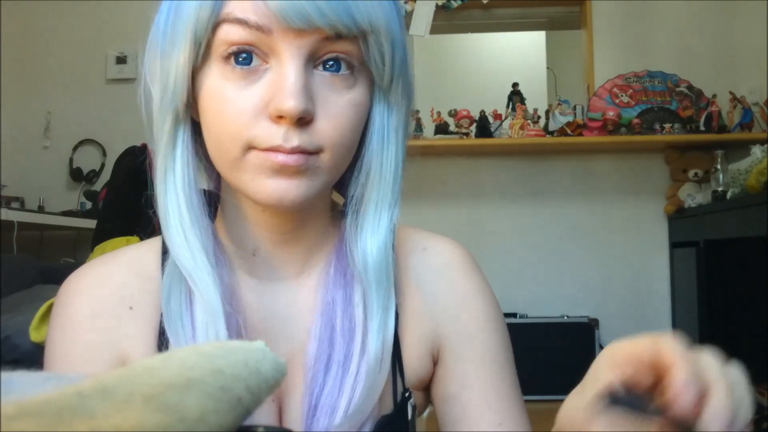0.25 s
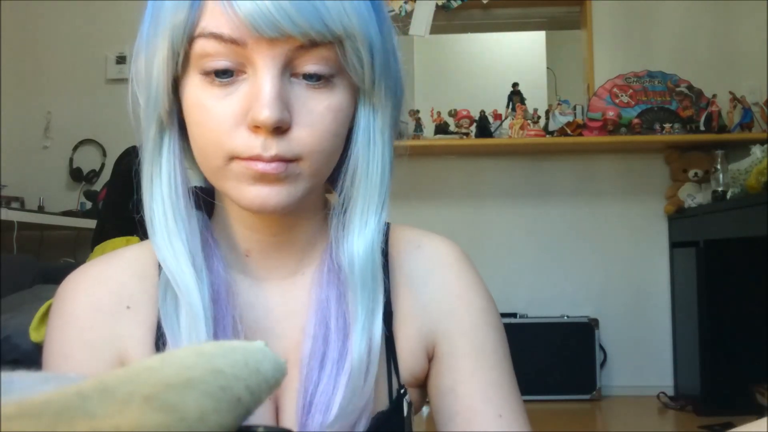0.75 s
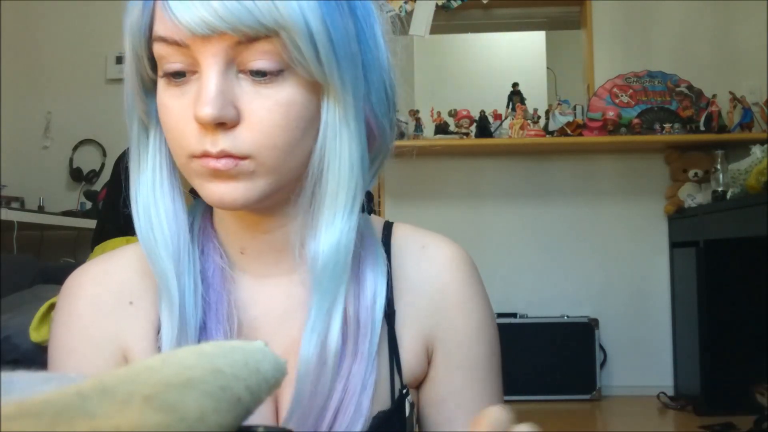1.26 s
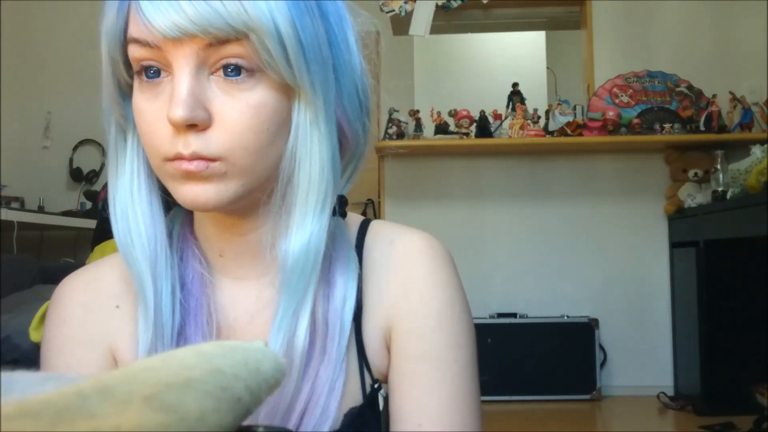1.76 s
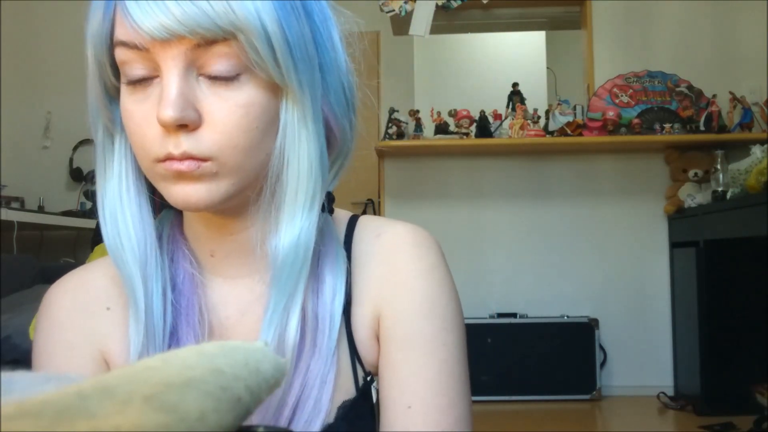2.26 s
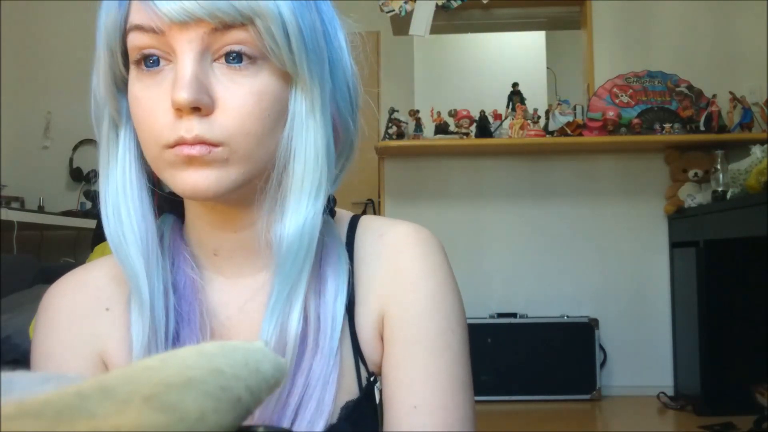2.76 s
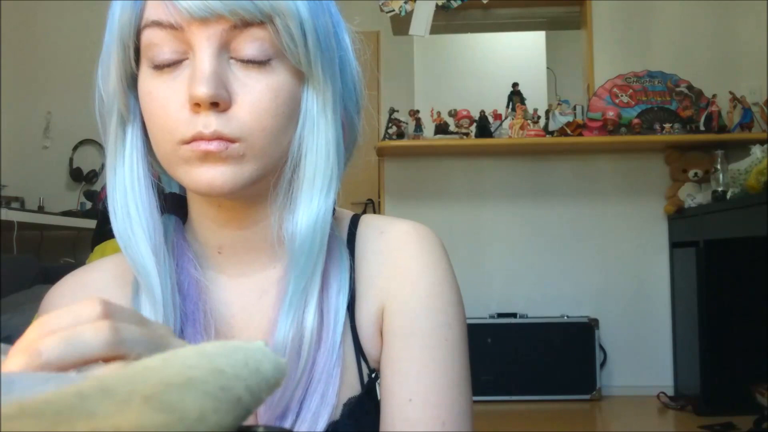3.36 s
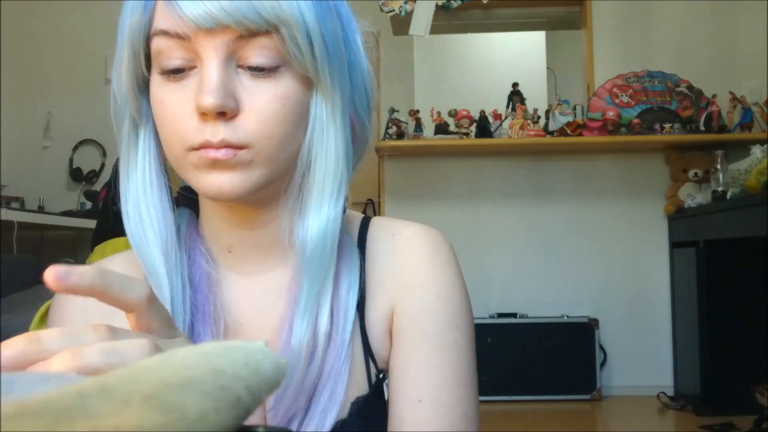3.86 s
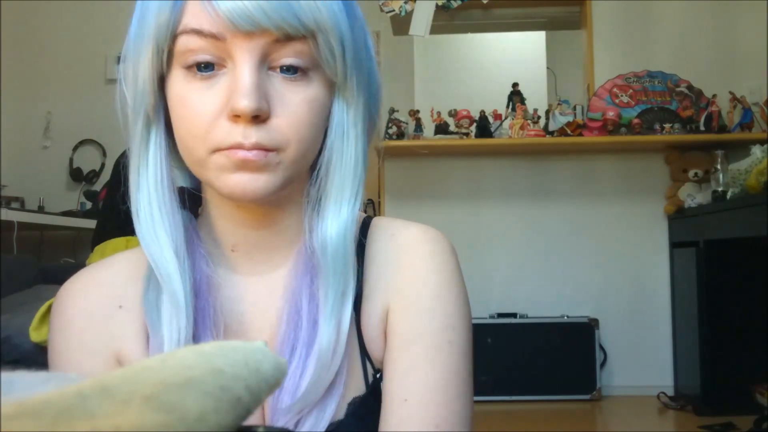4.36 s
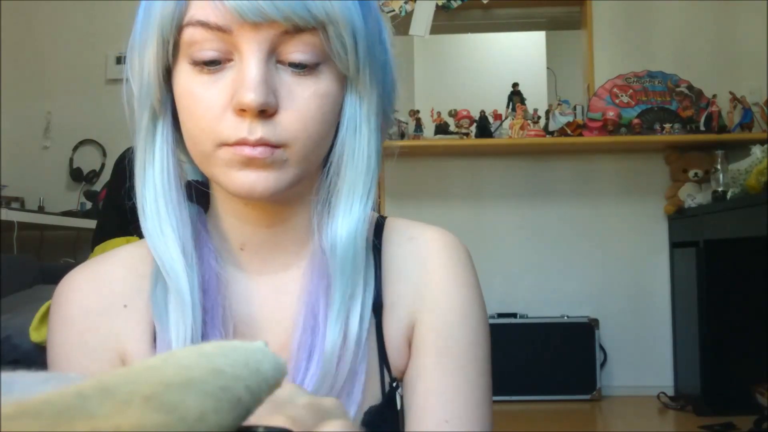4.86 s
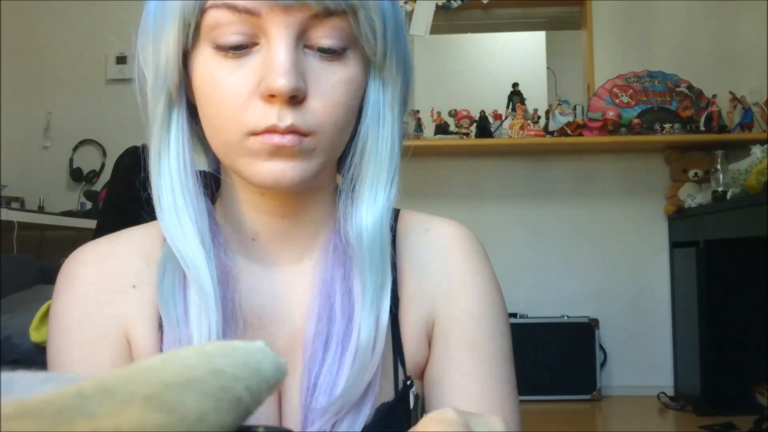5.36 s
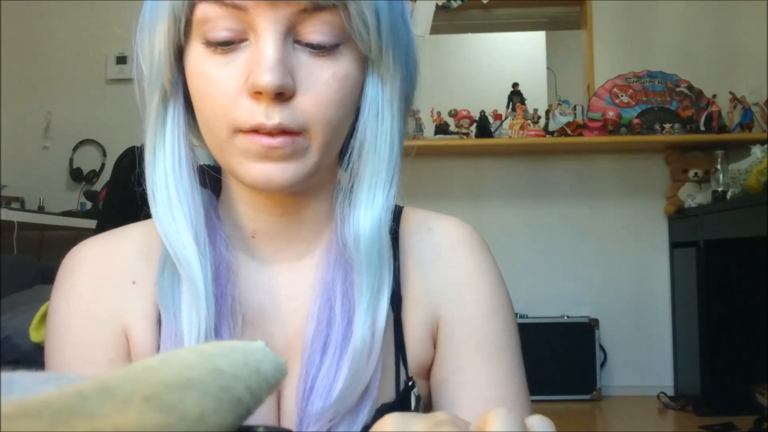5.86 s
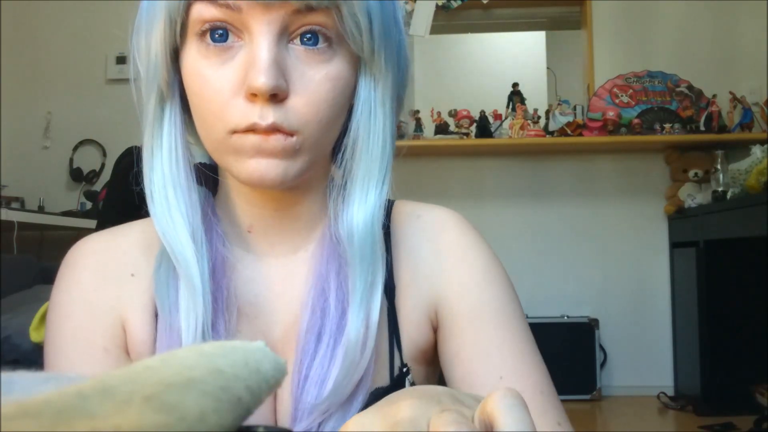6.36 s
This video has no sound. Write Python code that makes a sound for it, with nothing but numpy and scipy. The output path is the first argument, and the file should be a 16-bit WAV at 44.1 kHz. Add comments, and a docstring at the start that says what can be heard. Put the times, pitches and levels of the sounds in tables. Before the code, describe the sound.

A small furnished room holds a steady, slightly wavering fan hiss with a barely perceptible high whine. Close to a stereo microphone, small plastic make-up cases are handled on a desk. A soft scrape and light click come at 0.1 s, then a firmer, duller tap at 0.85 with another slide around it. A short swish passes at 1.6. From 2.0 to 2.7 a case scrapes and rustles, with faint touches and a tight flurry of crisp clicks at 2.37-2.45. Sliding and swishing continues near 3.0, with weak brushes until 4.2. After a light touch at 4.4, a palette slaps down at 4.5, bright, hard and much the loudest, with bounces dying within a tenth of a second and a short room tail. Quiet dull knocks and a faint slide follow at 5.5-5.7, a crisp click at 6.05, and tiny ticks at 6.2 over the hiss.

```python
"""A fan hisses in a small furnished room, as wavering coloured noise with a faint whine; hands rustle, as swelling noise.
Small plastic make-up cases are picked up and set down on a desk close beside a two-capsule microphone,
and a palette snaps down on it. Each contact is a few ms of random chatter that rings the plastic,
thuds the desk and cracks in the treble. A short noise tail adds the room to the contacts."""
import sys
import numpy as np
from scipy import signal
from scipy.fft import rfft, irfft, next_fast_len
from scipy.io import wavfile
from scipy.ndimage import uniform_filter1d

SR = 44100
rng = np.random.default_rng(int(sys.argv[2]) if len(sys.argv) > 2 else 0)


def digitize_waveform(pressure):
    """Quantize a signal to 16-bit integers and store it at the path in sys.argv[1].

    Rows of a 2-D input are taken as channels; values are limited to [-1, 1].
    """
    field = np.atleast_2d(pressure).T
    bounded = np.clip(field, -1, 1)
    quanta = np.round(bounded * 32767).astype(np.int16)
    wavfile.write(sys.argv[1], SR, quanta)


N = 291942  # samples


def undb(db):
    """Turn dB into an amplitude factor."""
    return 10 ** (np.asarray(db) / 20)


def level(x, db):
    """Scale to an rms level in dB of full scale."""
    return x * undb(db) / np.sqrt(np.mean(x ** 2))


def on_hz(table, hz):
    """Read a (Hz, value) table on a log frequency axis."""
    table_hz, values = np.transpose(table)
    return np.interp(np.log(np.maximum(hz, 1)), np.log(table_hz), values)


def colour(x, table):
    """Filter by a (Hz, dB) table, by scaling the spectrum."""
    length = x.shape[-1]
    size = next_fast_len(length)
    hz = np.arange(size // 2 + 1) * SR / size
    return irfft(rfft(x, size) * undb(on_hz(table, hz)), size)[..., :length]


def walk(rate):
    """Random levels held 1 / rate s and slewed twice; spread near 1."""
    hold = int(SR / rate)
    steps = np.repeat(rng.standard_normal(N // hold + 1), hold)
    slewed = uniform_filter1d(uniform_filter1d(steps, hold), hold)
    return 1.3 * slewed[:N]


# Steady hiss of fan and capsules, the part in step at both capsules. Each row: frequency [Hz], density [dB per Hz].
HISS_IN_STEP = [(12, -32), (20, -39), (45, -12.5), (250, -20), (400, -19), (880, -23.5), (1020, -17),
                (1300, -15.5), (1420, -21), (1800, -23), (2150, -22), (2700, -26), (3300, -30),
                (7300, -33.5), (9000, -38), (16000, -43.5)]
# The part in opposite step at the two capsules. Each row: frequency [Hz], density [dB per Hz].
HISS_OUT_OF_STEP = [(12, -63), (20, 16), (37, -20), (68, -13), (98, -1), (123, -11), (310, -13), (434, -11),
                    (499, -18.5), (1090, -13.5), (1400, -17.5), (7310, -30.5), (16000, -39.5)]
# Tilt of the hiss between the capsules. Each row: frequency [Hz], left minus right [dB].
HISS_BALANCE = [(60, -2.5), (1290, -2.5), (3000, 0), (8000, -3.5), (15000, 0.3)]
IN_STEP_DB, OUT_OF_STEP_DB = -66.5, -62  # rms, before the waver and the balance
WHINE_HZ, WHINE_DB = 9490, -96  # peak level


def hiss():
    """Steady noise of fan and capsules that wavers a little, with a faint electronic whine."""
    mid = level(colour(rng.standard_normal(N), HISS_IN_STEP), IN_STEP_DB) * undb(0.79 * walk(3.9))
    side = level(colour(rng.standard_normal(N), HISS_OUT_OF_STEP), OUT_OF_STEP_DB) * undb(.4 * walk(1.6))
    half_balance = np.array(HISS_BALANCE) * [1, .5]
    left = colour(mid + side, half_balance)
    right = colour(mid - side, half_balance * [1, -1])
    whine = undb(WHINE_DB) * np.sin(2 * np.pi * WHINE_HZ * np.arange(N) / SR)
    return np.array([left, right]) + whine


def strokes(rows, spectrum):
    """Coloured noise, unrelated at the two capsules, that swells and fades once for each row."""
    middle_s, length_s, db = np.transpose(rows)[:, :, None]
    position = (np.arange(N) / SR - middle_s) / length_s
    swell = np.cos(np.pi * np.clip(position, -.5, .5))
    noise = level(colour(rng.standard_normal((2, N)), spectrum), 0)
    return noise * np.sum(swell * undb(db), axis=0)


# Swishes of skin and cloth. Each row: middle [s], length [s], level before the flutter [dB].
SWISHES = [(.2, .28, -78), (1.597, 0.13, -68), (2.4, 0.96, -72.5), (2.986, 0.35, -70.5),
           (3.373, .17, -71.5), (3.596, 0.1, -77), (3.87, 0.11, -76.5), (4.205, 0.073, -77.5),
           (6.206, 1.2, -78)]
# Treble colour of a swish. Each row: frequency [Hz], level [dB].
SWISH_COLOUR = [(2500, -13), (4800, -3), (6500, -4), (7800, 5.5), (9000, -8.5), (13000, -17), (16000, -16)]
# Slides of a case over the desk. Each row: middle [s], length [s], level before the unevenness [dB].
SLIDES = [(.2, 0.37, -69), (.955, .35, -69), (1.997, 0.38, -71), (2.35, 0.77, -64), (2.986, 0.53, -67.5),
          (5.613, 0.62, -75)]
# Lower colour of a scrape on the desk. Each row: frequency [Hz], level [dB].
SCRAPE_COLOUR = [(120, -24), (250, -16.5), (650, -10), (1000, -14), (1700, -12), (2600, -17), (6000, -34),
                 (16000, -65)]
SWISH_FLUTTER_DB, SCRAPE_UNEVEN_DB = 1.8, 2


def rustle():
    """Skin and cloth swish in the treble; things scrape the desk unevenly lower down."""
    swishes = strokes(SWISHES, SWISH_COLOUR) * undb(SWISH_FLUTTER_DB * walk(30))
    slides = strokes(SLIDES, SCRAPE_COLOUR) * undb(SCRAPE_UNEVEN_DB * walk(40))
    return swishes + slides


def ring(modes, t):
    """Impulse response of damped modes (Hz, dB, t60 s), scaled to unit energy."""
    hz, db, t60 = (column[:, None] for column in np.transpose(modes))
    waves = np.sin(2 * np.pi * np.minimum(hz, SR / 2.2) * t)
    y = np.sum(undb(db) * waves * 1000 ** (-t / t60), axis=0)
    return y / np.sqrt(np.sum(y ** 2))


def chatter_burst(rise_ms, chatter_ms):
    """Tiny impacts of uneven size that swell and die; left, right and room each hear their own mix."""
    ms = np.arange(2048) / SR * 1000
    chance = rng.standard_normal((4, 2048))
    uneven = chance[:3] * undb(5.6 * chance[3])
    fade = np.exp(-ms / max(chatter_ms, .2))
    chatter = uneven * np.minimum(ms / max(rise_ms, .05), 1) * fade
    # the first clean impact stands out, less so when the contact is slow
    strike = undb(STRIKE_DB) / max(rise_ms, .5) * np.exp(-rise_ms / max(chatter_ms, .2))
    chatter[:, int(rise_ms * SR / 1000)] += strike
    return chatter


# Modes of the desk, heard as the thud. Each row: frequency [Hz], level [dB], decay by 60 dB [s].
DESK_MODES = [(117, -35.5, 0.18), (166.4, -4.5, 0.2), (221, -13, 0.29), (299.6, -1, 0.1),
              (378, -1.5, 0.098), (508.4, -14, 0.22), (616, -11.5, 0.084), (714, 3.5, 0.057)]
STRIKE_DB = 17.5  # first impact over the chatter, for a contact that rises in 1 ms
CRACK_CYCLES = 3  # cycles in which a crack decays by 60 dB
ROOM_BLUR = .3  # factor on the plastic's decay times, as sent to the room


def add_contact(out, row, modes, wet_db):
    """A burst of chatter drives the plastic and the desk, and cracks in a broad band."""
    s, db, pan_db, thud_db, crack_db, crack_hz, rise_ms, chatter_ms = row
    t = np.arange(SR // 4) / SR
    # a tiny source radiates no bass: the slope of the ring is taken
    crack_ring = ring([(crack_hz, 0, CRACK_CYCLES / crack_hz)], t)
    crack = np.gradient(crack_ring) * SR / (2 * np.pi * crack_hz)
    rest = undb(thud_db) * ring(DESK_MODES, t) + undb(crack_db) * crack
    # summed over all directions the sharp modes blur, so the room gets a smoother colour
    plastic = ring(modes, t)
    blurred = ring(np.array(modes) * [1, 1, ROOM_BLUR], t)
    bodies = rest + np.array([plastic, plastic, blurred])
    y = signal.fftconvolve(chatter_burst(rise_ms, chatter_ms), bodies, axes=1)
    # level at the loudest 128 samples
    y /= np.sqrt(np.max(uniform_filter1d(np.mean(y ** 2, axis=0), size=128)))
    y *= undb(db + np.array([[pan_db / 2], [-pan_db / 2], [wet_db]]))
    start = int(s * SR)
    out[:, start:start + y.shape[1]] += y[:, :N - start]


# Small cases on the desk close to the microphone. Each row: start [s], level before the capsules [dB],
# left minus right before the shading [dB], desk thud [dB], crack [dB], rise [ms], main ring [Hz].
CASE_TAPS = [(.0725, -48.5, 2.5, -18, -9, 5.5, 1260), (.808, -57, -4, -7, -31, 9.3, 557),
             (.848, -39.5, 5.5, -1, -8.5, 1.26, 1036), (1.952, -60.5, -7, -12, -14, 17, 663),
             (2.184, -61.5, -10, -11, -16, 17, 660), (2.261, -60.5, -9, 13, -28, 8.2, 1580),
             (2.283, -61, -20, -4, -22, 8.1, 534), (2.3685, -51, -1, -26, -7.5, 0.55, 1270),
             (2.407, -44.5, 1, -24, 1.5, 0.45, 1770), (2.4184, -44, -5, -6, 1, 0.77, 1740),
             (2.449, -49.5, -8, -15, -17, 3, 573), (2.51, -59.5, -5, -14, -25, 5.4, 680),
             (5.511, -58.5, 1, -12, -18, 13, 713), (5.614, -63, 1, -10, -17, 3, 510),
             (5.676, -52.5, -6.5, 7.5, -25, 3.1, 1270), (5.708, -57.5, -6, 2, -22, 6.6, 700),
             (6.053, -44, -1, -30, 3.5, 0.97, 1390), (6.201, -58, 2, -9, -5, 0.98, 1350),
             (6.229, -57.5, -1, -17, 3, 2.9, 1760), (6.242, -55, -2, -24, -5, 2, 2180)]
# Modes of a small case. Each row: multiple of the main ring [ratio], level [dB], decay by 60 dB [s].
CASE_MODES = [(1, 10.5, 0.022), (1.2, 5, 0.018), (1.62, 0, 0.018), (2.4, 4.5, 0.009), (2.85, -5.5, 0.014)]
# a slower contact also chatters longer
CASE_CHATTER_MS, CHATTER_PER_RISE = 2.33, 0.53  # ms for no rise, ms per ms of rise
CASE_CRACK_HZ, CASE_WET_DB = 5450, -4


def case_taps(out):
    """Light plastic taps; a smaller case rings higher in all its modes."""
    for *row, rise_ms, ring_hz in CASE_TAPS:
        chatter_ms = CASE_CHATTER_MS + CHATTER_PER_RISE * rise_ms
        modes = np.array(CASE_MODES) * [ring_hz, 1, 1]
        add_contact(out, (*row, CASE_CRACK_HZ, rise_ms, chatter_ms), modes, CASE_WET_DB)


# Palette on the desk: a touch, the slap and its bounces.
# Each row: start [s], level before the capsules [dB], left minus right before the shading [dB].
PALETTE_HITS = [(4.407, -37, -1), (4.492, -17.5, -2.5), (4.5145, -22, -3.5), (4.534, -37, -7),
                (4.552, -35.5, -2), (4.576, -47.5, -5)]
# Modes of the palette. Each row: frequency [Hz], level [dB], decay by 60 dB [s].
PALETTE_MODES = [(710, -4, 0.04), (925, -2.5, 0.031), (1105, 2, 0.036), (1272, 0, 0.018),
                 (1705, 0.5, 0.025), (2038, 3.5, 0.029), (2350, -13, 0.011), (3030, -3, 0.019),
                 (3580, -6.5, 0.0087), (3780, -3, 0.008), (5000, -10.5, 0.014), (5640, -1, 0.0073),
                 (6000, -2, 0.019), (7000, 1.5, 0.0054), (7400, -3.5, 0.0047), (8090, 10, 0.0065)]
HARD_DB = -17.5  # level of a blow at which the thud and crack values hold
HARD_THUD_DB, THUD_PER_DB = -9, -.5
HARD_CRACK_DB, CRACK_PER_DB = 3, 2.3
HARD_CRACK_HZ, CRACK_OCTAVES_PER_DB = 7700, 0.51
PALETTE_RISE_MS, PALETTE_CHATTER_MS, PALETTE_WET_DB = .8, 3.1, -2.2


def palette_hits(out):
    """Harder blows crack more and brighter; softer ones leave more of the desk thud."""
    for s, db, pan_db in PALETTE_HITS:
        force_db = db - HARD_DB
        thud_db = HARD_THUD_DB + THUD_PER_DB * force_db
        crack_db = HARD_CRACK_DB + CRACK_PER_DB * force_db
        crack_hz = HARD_CRACK_HZ * 2 ** (CRACK_OCTAVES_PER_DB * force_db)
        row = (s, db, pan_db, thud_db, crack_db, crack_hz, PALETTE_RISE_MS, PALETTE_CHATTER_MS)
        add_contact(out, row, PALETTE_MODES, PALETTE_WET_DB)


# Decay of the small furnished room. Each row: frequency [Hz], decay by 60 dB [s].
ROOM_T60 = [(150, 0.58), (500, 0.27), (1300, 0.33), (2100, 0.36), (4000, 0.27), (12000, 0.31)]
ROOM_DB, ROOM_GAP_MS = 0, 2.96
DESK_ECHO_DB, DESK_ECHO_T60_S = 6, 0.096


def room(x):
    """Dense reflections swell over a short gap; each octave dies at its own rate, unrelated at the capsules."""
    t = np.arange(SR // 2) / SR
    tail = 0
    for hz in 63 * 2. ** np.arange(9):
        octave = [(hz / 2, -30), (hz / 1.3, 0), (hz * 1.3, 0), (hz * 2, -30)]
        band = colour(rng.standard_normal((2, len(t))), octave)
        tail = tail + band * 1000 ** (-t / on_hz(ROOM_T60, hz))
    # things on the desk top scatter early and briefly
    tail = tail * (1 + undb(DESK_ECHO_DB) * 1000 ** (-t / DESK_ECHO_T60_S))
    tail = tail * np.minimum(t * 1000 / ROOM_GAP_MS, 1) ** 2
    tail = tail * undb(ROOM_DB) / np.sqrt(np.sum(tail ** 2) / 2)
    return signal.fftconvolve(x, tail, axes=1)[:, :N]


# The desk top mirrors each contact and cancels a band near 4 kHz. Each row: frequency [Hz], level [dB].
DESK_NOTCH = [(3100, 0.74), (3900, -5), (4800, -0.04)]
# Both capsules: weak bass, a shoulder at 9 kHz. Each row: frequency [Hz], level [dB].
CAPSULE = [(40, -13), (150, -8.5), (400, 0), (3000, 7), (8500, 4), (10000, -3), (12000, -0.5), (14000, -7),
           (15500, -24)]
# The left capsule faces away from the desk, so it hears contacts duller. Each row: frequency [Hz], level [dB].
FAR_SIDE = [(100, -14), (600, -10), (1200, -5), (2200, 1.5), (5500, -0.5), (8000, -24), (13000, -9)]
FAR_LAG_MS = .55


def pick_up(contacts):
    """Contacts reach the far capsule late and shaded; the room follows, shaded less."""
    near_left, near_right, to_room = colour(colour(contacts, DESK_NOTCH), CAPSULE)
    wet = room(np.tile(to_room, (2, 1)))
    lag = int(FAR_LAG_MS * SR / 1000)
    direct_left = np.roll(colour(near_left, FAR_SIDE), lag)
    room_left = colour(wet[0], np.array(FAR_SIDE) * [1, .6])
    return np.array([direct_left + room_left, near_right + wet[1]])


def scene():
    """Hiss and rustle lie under the case taps and the palette blows."""
    contacts = np.zeros((3, N))  # left, right and room
    palette_hits(contacts)
    case_taps(contacts)
    return pick_up(contacts) + rustle() + hiss()


TOP_HZ, OFFSET = 15750, -.0015  # offset in parts of full scale


def record(dry):
    """The top is cut by a steep filter; the converter adds a small constant offset."""
    sos = signal.ellip(10, .2, 70, TOP_HZ, fs=SR, output="sos")
    return signal.sosfilt(sos, dry) + OFFSET


dry = scene()
out = record(dry)
digitize_waveform(out)
```